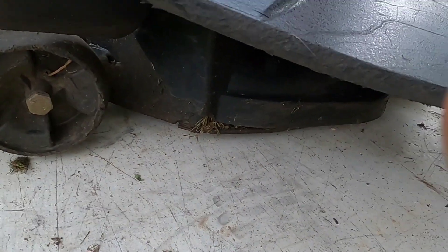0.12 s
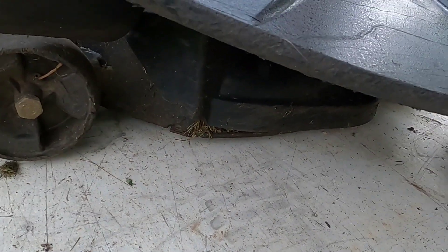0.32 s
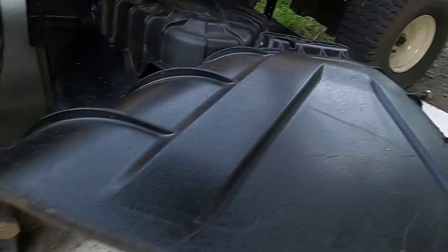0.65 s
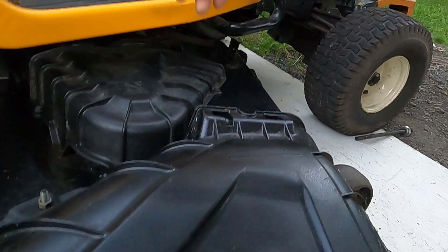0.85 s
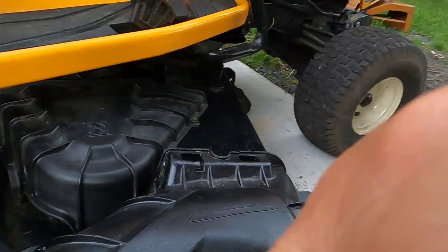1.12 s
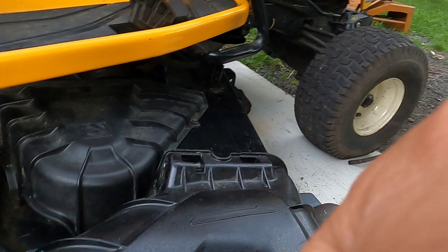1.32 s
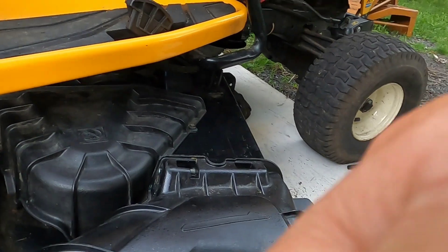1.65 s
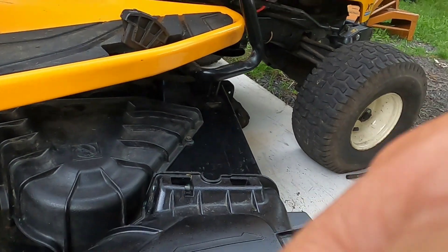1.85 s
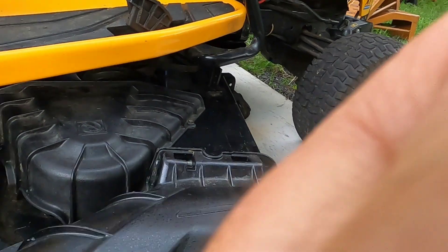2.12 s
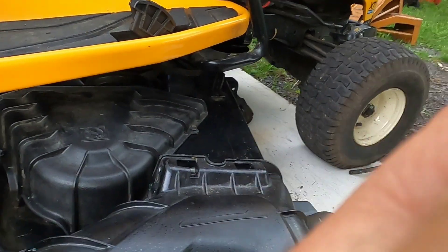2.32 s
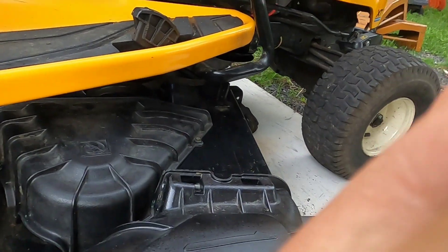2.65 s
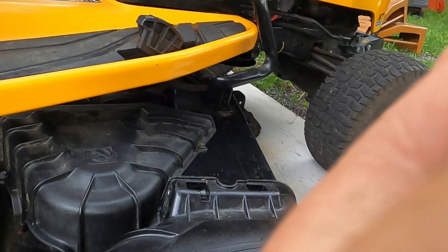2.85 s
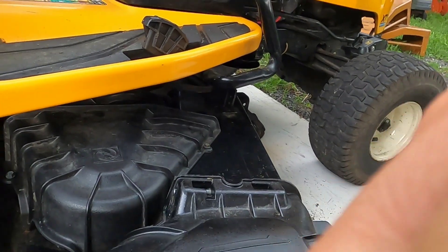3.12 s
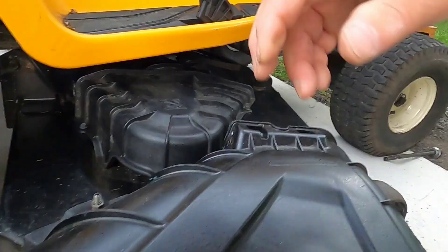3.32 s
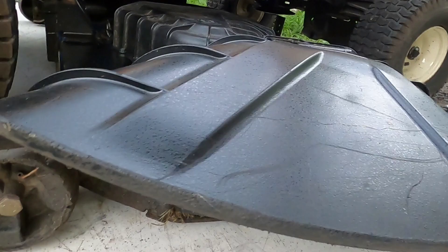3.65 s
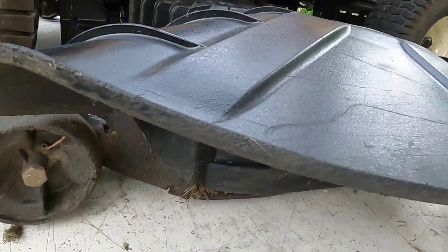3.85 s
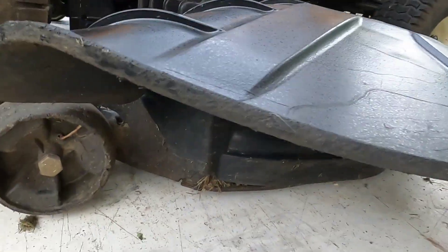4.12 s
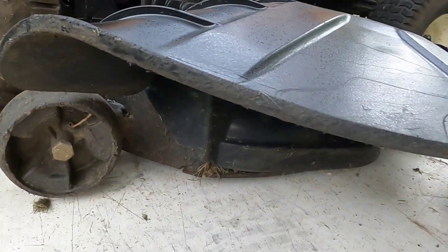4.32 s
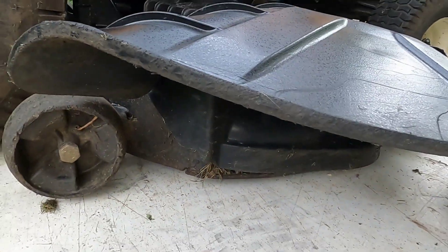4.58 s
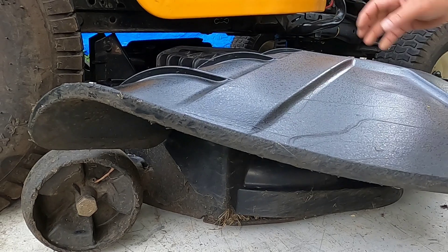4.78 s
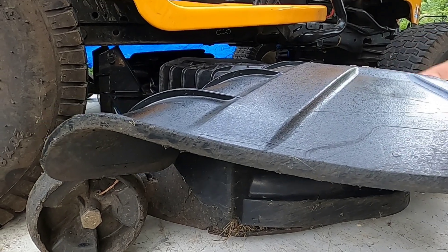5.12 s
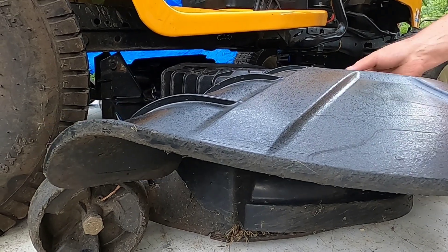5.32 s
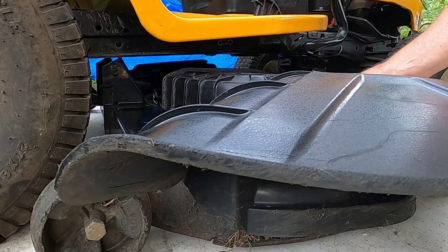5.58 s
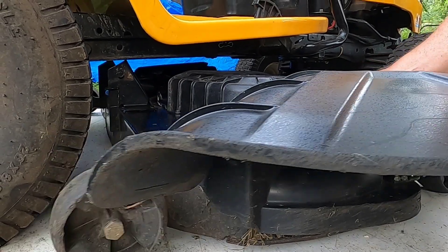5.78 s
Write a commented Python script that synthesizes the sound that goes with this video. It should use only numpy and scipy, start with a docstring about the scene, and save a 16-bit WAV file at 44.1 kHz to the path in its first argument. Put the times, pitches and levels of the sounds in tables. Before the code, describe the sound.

Outdoors, a hand rubs and jiggles loose plastic on a mower deck, then hard clunks, scraping and a rough groan as it is shoved.

```python
"""A steel mower deck is shoved into place under a riding mower, outdoors on a smooth board.
Struck shell modes knock, heavy sagging sines thud, stick-slip grains skid, rasp and groan; at last wheels roll.
Nearby, a hand rubs and swishes as filtered grains; the loose chute chirps and ticks.
Behind lie low rumble, light air, a far hum, a thin insect trill and two slurred bird notes."""
import sys
import numpy as np
from scipy import signal
from scipy.fft import rfft, irfft
from scipy.io import wavfile
from scipy.ndimage import uniform_filter1d

SR = 44100
rng = np.random.default_rng(int(sys.argv[2]) if len(sys.argv) > 2 else 0)


def unload_audio(sound):
    """Save the sound as a 16-bit wav file, at the path given as the first command line argument."""
    columns = np.transpose(np.atleast_2d(sound))
    # keep every value between -1 and 1, then stretch to whole-number steps
    steps = np.round(np.clip(columns, -1, 1) * 32767)
    wavfile.write(sys.argv[1], SR, steps.astype(np.int16))


N = 262395
TIME = np.arange(N) / SR
FREQ = np.fft.rfftfreq(N, 1 / SR)
EDGE_HZ = 15750


def amp(db):
    """Decibels to gain."""
    return 10 ** (np.asarray(db) / 20)


def evened(x):
    """Scales to rms 1."""
    return x / np.sqrt(np.mean(x ** 2) + 1e-20)


def add(mix, start_s, sound):
    """Mixes a sound in at start_s, cut to fit."""
    part = mix[max(0, round(start_s * SR)):][:len(sound)]
    part += sound[:len(part)]


def colour(x, points):
    """Filters by a gain curve that falls steeply outside its ends."""
    hz, db = np.transpose(points)
    octave = np.log2(FREQ + 1)
    below = np.maximum(np.log2(hz[0]) - octave, 0)
    above = np.maximum(octave - np.log2(hz[-1]), 0)
    gain_db = np.interp(octave, np.log2(hz), db) - 98 * (below + above)
    return irfft(rfft(x) * amp(gain_db), N)


def band(x, lo_hz, hi_hz, order=3):
    """Causal band-pass."""
    sos = signal.butter(order, [lo_hz, min(hi_hz, .49 * SR)], "band", fs=SR, output="sos")
    return signal.sosfilt(sos, x)


def wander(rate_hz):
    """Smooth chance of rms 1 that changes about rate_hz times a second."""
    return evened(irfft(rfft(rng.standard_normal(N)) * np.exp(-(FREQ / rate_hz) ** 2), N))


def grains(per_s, spread_db, smooth):
    """Tiny slips of uneven size over a smooth hiss."""
    size = amp(spread_db * np.minimum(rng.exponential(1, N), 4))
    size = size * rng.choice([-1, 1], N)
    slipping = rng.random(N) < per_s / SR
    return evened(size * slipping) + smooth * rng.standard_normal(N)


def drift(x, patch_db):
    """A moving contact point makes the colour of a rub drift in patches."""
    z = signal.stft(x, nperseg=512, noverlap=384)[2]
    patches = rng.standard_normal(z.shape)
    for _ in range(2):
        patches = uniform_filter1d(patches, size=5, axis=0)
        patches = uniform_filter1d(patches, size=16, axis=1)
    z = z * amp(patch_db * evened(patches))
    return evened(signal.istft(z, nperseg=512, noverlap=384)[1][:N])


def sing(hz, width_hz):
    """A fuzzy tone of rms 1: two quadrature carriers under independent slow noise."""
    turn = 2 * np.pi * np.cumsum(hz * np.ones(N)) / SR
    return evened(wander(width_hz) * np.cos(turn) + wander(width_hz) * np.sin(turn))


def hold(start_s, length_s, attack_s, release_s):
    """Linear attack, hold and exponential release."""
    attack = np.clip((TIME - start_s) / attack_s, 0, 1)
    return attack * np.exp(-np.maximum(TIME - start_s - length_s, 0) / release_s)


# modes of the deck shell: (pitch [Hz], relative level [dB], t60 [s])
SHELL_MODES = [(188.3, 17.5, 0.13), (319.3, 11.5, 0.3), (397, 7, 0.1), (456, -5.5, 0.088), (686, -8, 0.056),
               (893, -19.5, 0.055), (1628, 5, 0.031), (2074, -1.5, 0.012), (2740, -9.5, 0.0073),
               (3766, 5.5, 0.042)]
PLACE_DB = 3  # rms spread of mode levels


def shell(x, ring_db):
    """The contact plus the deck modes it sets ringing; each place of contact favours other modes."""
    t = np.arange(SR // 3) / SR
    place_db = PLACE_DB * rng.standard_normal(len(SHELL_MODES))
    ring = np.zeros(len(t))
    for (hz, db, t60_s), luck_db in zip(SHELL_MODES, place_db):
        mode = amp(db + luck_db - 60 * t / t60_s) * np.cos(2 * np.pi * hz * t)
        ring += mode * 2 * np.log(1000) / (t60_s * SR)  # unit peak gain at 0 dB
    return x + amp(ring_db) * signal.oaconvolve(x, ring)[:len(x)]


# level of the far hum before its flutter: (time [s], level [dB])
HUM_LEVEL = [(0, -61), (1.2, -54.5), (3.9, -54), (4.8, -46.5), (5.03, -44.5), (5.12, -50), (5.75, -49.5)]
HUM_HZ = 172.6


def hum():
    """A far motor: one sine with wandering pitch and level."""
    level_db = np.interp(TIME, *np.transpose(HUM_LEVEL)) + 3.96 * wander(12.6)
    hz = HUM_HZ + 3.8 * wander(13.5)
    return amp(level_db) * evened(np.sin(2 * np.pi * np.cumsum(hz) / SR))


TRILL_HZ, TRILL_DB = 5240, -71.5


def trill():
    """An insect: a thin fuzzy tone that comes and goes."""
    tone = sing(TRILL_HZ, width_hz=220)
    phrases = np.clip(1 + .6 * wander(8), 0, 1.5)
    return amp(TRILL_DB) * phrases * tone


# far bird notes: (time [s], length [s], start pitch [Hz], end pitch [Hz], level [dB])
BIRD_NOTES = [(1.779, 0.067, 2900, 2750, -61.5), (4.646, 0.13, 3700, 3460, -61)]


def birds():
    """Sines slurred downward with a fast waver in pitch."""
    out = np.zeros(N)
    waver = 1 + .04 * wander(700)
    for start_s, length_s, start_hz, end_hz, db in BIRD_NOTES:
        n = round(length_s * SR)
        hz = np.linspace(start_hz, end_hz, n) * waver[round(start_s * SR):][:n]
        note = np.sin(2 * np.pi * np.cumsum(hz) / SR) * signal.windows.tukey(n, .6)
        add(out, start_s, amp(db) * evened(note))
    return out


# filter of the air: (frequency [Hz], gain [dB])
AIR_GAIN = [(150, 0), (260, -9), (420, -21), (1300, -25), (2800, -31), (6000, -34), (8000, -43),
            (14000, -58)]
AIR_DB = -57


def outdoors():
    """Light air as slowly swaying filtered noise, with hum, trill and birds."""
    air = drift(colour(rng.standard_normal(N), AIR_GAIN), patch_db=3.0)
    return amp(AIR_DB + wander(0.16)) * air + hum() + trill() + birds()


# strokes of the hand over the chute; levels relative to each layer's trim:
# (middle [s], half-width to 1/e^2 [s], rub [dB], swish [dB], fizz [dB])
HAND_STROKES = [(0.094, 0.056, -63, -56.5, -66), (0.161, 0.02, -56, -49.5, -51.5),
                (0.269, 0.064, -57, -56, -61), (1.347, 0.097, -59, -64.5, -76),
                (1.594, 0.026, -54.5, -49.5, -50), (1.685, 0.16, -49.5, -58, -73),
                (1.874, 0.032, -45, -44, -68), (1.89, 0.002, -35, -29, -37),
                (2.19, 0.033, -44, -47.5, -45.5), (2.337, 0.084, -51, -53, -77),
                (2.456, 0.028, -38.5, -52.5, -54.5), (2.609, 0.067, -45, -56.5, -58),
                (2.734, 0.022, -37.5, -47.5, -59), (2.84, 0.019, -54, -53, -53.5),
                (3.228, 0.055, -48.5, -61, -84), (3.347, 0.042, -46.5, -60, -89)]


def stroking(column):
    """Gain of one layer of the strokes: the hand speeds up and slows down in a bell shape."""
    gain = np.zeros(N)
    for middle_s, width_s, *dbs in HAND_STROKES:
        gain += amp(dbs[column]) * np.exp(-2 * np.minimum(((TIME - middle_s) / width_s) ** 2, 20))
    return gain


# shoves that skid the deck over the board; levels at mid-shove, relative to each layer's trim:
# (start [s], length [s], grinding [dB], grit [dB], rumble [dB], swell [dB/s])
DECK_SHOVES = [(0.056, 0.24, -66, -84, -41, -3), (0.421, 0.095, -53.5, -65, -38, 143),
               (2.398, 0.66, -69, -64.5, -38.5, -3), (3.539, 0.13, -49.5, -57, -49, -18),
               (4.014, 0.11, -42, -49.5, -30, -150), (4.143, 0.024, -44, -49.5, -22, 7),
               (4.221, 0.084, -41, -48.5, -34, 82), (4.311, 0.068, -38, -40, -34, 5),
               (4.413, 0.13, -38.5, -44, -33, 37), (4.613, 0.12, -62, -63.5, -40, 13),
               (4.869, 0.072, -53.5, -58.5, -54, 7)]
BREAKAWAY_S, STOP_S = 0.014, 0.022  # a skid starts and stops quickly


def shoving(column):
    """Gain of one layer of the skids: each breaks away, swells or eases as it slides, and stops."""
    gain = np.zeros(N)
    for start_s, length_s, *dbs, swell_db_per_s in DECK_SHOVES:
        from_middle_s = np.clip(TIME - start_s, 0, length_s) - length_s / 2
        level = amp(dbs[column] + swell_db_per_s * from_middle_s)
        gain += level * hold(start_s, length_s, BREAKAWAY_S, STOP_S)
    return gain


# filter of the rumble: (frequency [Hz], gain [dB])
RUMBLE_GAIN = [(20, -19.5), (38, 3.5), (65, -3.5), (110, -5), (190, -12), (270, -17), (400, -26)]


def rumble(rest_db=-48, hand_db=7, deck_db=-1):
    """Levelled low noise, always present, that grows with each stroke and each shove."""
    shake = colour(rng.standard_normal(N), RUMBLE_GAIN)
    shake /= np.sqrt(uniform_filter1d(shake ** 2, SR // 8) + 1e-12)
    hand = amp(hand_db) * uniform_filter1d(stroking(column=1), SR // 6)
    deck = amp(deck_db) * uniform_filter1d(shoving(column=2), SR // 25)
    return shake * np.sqrt(amp(rest_db) ** 2 + hand ** 2 + deck ** 2)


# filters of rub, swish and fizz: (frequency [Hz], gain [dB])
RUB_GAIN = [(200, 7), (400, -6), (750, -10), (1500, -13), (2000, -72)]
SWISH_GAIN = [(1500, 6), (2700, 6.5), (5100, 4.5), (8500, -4), (11000, -14), (14000, -16.5)]
FIZZ_GAIN = [(4500, -20), (8000, -13), (11000, -12), (12300, 0), (14000, -2), (15700, -8)]
# the arm reaches over the deck: (start [s], length [s])
ARM_REACHES = [(0.294, 1.29), (2.1, 1.596)]


def handling(rub_db=-1, swish_db=-1, fizz_db=1, reach_rub_db=-63, reach_swish_db=-61):
    """The hand drags over plastic with a very high fizz; a faint steady rustle while the arm reaches."""
    grip = amp(2.1 * wander(90))
    reach = sum(hold(start_s, length_s, 0.28, 0.04) for start_s, length_s in ARM_REACHES)
    rub_level = amp(rub_db) * grip * stroking(column=0) + amp(reach_rub_db) * reach
    rub = evened(colour(grains(900, 2.7, 0.35), RUB_GAIN)) * rub_level
    hiss = colour(grains(3000, 2.6, 1.0), SWISH_GAIN)
    stroke_hiss = drift(hiss, patch_db=3.5)
    reach_hiss = drift(hiss, patch_db=2.6)
    swish = stroke_hiss * amp(swish_db) * grip * stroking(column=1)
    swish += reach_hiss * amp(reach_swish_db) * reach
    fizz = evened(colour(grains(7400, 6.0, 0.9), FIZZ_GAIN))
    return rub + swish + amp(fizz_db) * fizz * stroking(column=2)


# filter of the chute ticks: (frequency [Hz], gain [dB])
TICK_GAIN = [(200, 23), (800, 5), (1500, 5.5), (4000, -2.5), (8000, -36)]
JIGGLE_S, SETTLED_S = 1.9, 3.6  # the chute is worked to and fro between these times


def ticks(tick_db=-59):
    """While it is worked to and fro the loose chute ticks at random against the shell."""
    taps = colour(shell(grains(110, 3, 0), ring_db=-6), TICK_GAIN)
    return amp(tick_db) * evened(taps) * hold(JIGGLE_S, SETTLED_S - JIGGLE_S, 0.075, 0.056)


# chirps of one part of the chute or frame: (peak time [s], decay constant [s], pitch [Hz], level [dB])
CHIRP_SLIPS = [(0.217, 0.0019, 870, -38.5), (0.472, 0.0032, 790, -37), (1.405, 0.016, 1690, -48.5),
               (1.631, 0.0068, 916, -37.5), (1.697, 0.0076, 2060, -34), (2.754, 0.0023, 4000, -30.5),
               (2.756, 0.013, 750, -35.5), (2.581, 0.023, 4260, -48), (3.217, 0.024, 2840, -52.5),
               (3.594, 0.069, 3600, -54.5), (4.167, 0.0046, 1900, -30), (4.181, 0.014, 536, -31.5),
               (4.298, 0.0013, 4080, -26.5), (5.228, 0.0097, 2450, -49.5)]


def slips(slip_db=0, spread=1.12):
    """A contact lets go for a moment: a burst of friction swells and fades in one resonance."""
    out = np.zeros(N)
    t = np.arange(-SR // 10, SR // 10) / SR
    for peak_s, decay_s, hz, db in CHIRP_SLIPS:
        swell = np.exp(np.where(t < 0, 2 * t, -t) / decay_s)  # starts twice as fast as it fades
        chirp = band(rng.standard_normal(len(t)) * swell, hz / spread, hz * spread, order=2)
        chirp *= np.sqrt(decay_s * SR) / np.linalg.norm(chirp)
        add(out, peak_s + t[0], amp(db + slip_db) * chirp)
    return out


# groan of the rim under full weight, before roughness: (time [s], pitch [Hz], level [dB])
GROAN_PATH = [(4.251, 1001, -54), (4.324, 919, -29.5), (4.345, 920, -43), (4.39, 885, -48),
              (4.425, 730, -38.5), (4.495, 705, -46.5), (4.523, 740, -34), (4.549, 880, -40),
              (4.585, 764, -47), (4.61, 756, -79)]


def groan(rough_db=3):
    """Under full weight stick and slip lock into a rough note that slides with the load."""
    s, hz, db = np.transpose(GROAN_PATH)
    pitch_hz = np.interp(TIME, s, hz) * (1 + .12 * wander(300))
    level = amp(np.interp(TIME, s, db) + rough_db * wander(93))
    level = level * (TIME > s[0]) * (TIME < s[-1])
    return level * evened(np.sin(2 * np.pi * np.cumsum(pitch_hz) / SR))


# filters of grinding, grit and rolling: (frequency [Hz], gain [dB])
GRIND_GAIN = [(200, -5.5), (330, -5), (540, -8.5), (720, -2.5), (950, -6), (1150, -12.5), (1700, -17)]
GRIT_GAIN = [(1350, -3.5), (1800, -6.5), (2400, -7.5), (4300, -9), (5000, -13.5), (6000, -15), (8300, -22),
             (12500, -31.5), (15000, -43)]
ROLL_GAIN = [(80, 14), (105, 4), (170, 6.5), (245, 2.5), (400, -14), (750, -15), (1100, -25.5), (2200, -30)]
# resonances in which the steel rim rasps: (pitch [Hz], width [Hz], relative level [dB])
RASP_TONES = [(1480, 130, -3.5), (1950, 110, -9), (2800, 110, -8.5), (4400, 200, -6)]
# gauge wheels: level at the start, before the layer trims, and its rise as they gather speed
ROLL_START_S, ROLL_DB, ROLL_RISE_DB_PER_S = 5.742, -51, 74.5


def skids(grind_db=0, grit_db=0, roll_db=11, boom_db=2, wheel_grit_db=-20):
    """The rim sticks and slips on the board and the shell booms; at last the gauge wheels roll."""
    judder = amp(0.83 * wander(73))
    grind = drift(colour(shell(grains(1100, 2.8, 0.2), ring_db=-35.0), GRIND_GAIN), patch_db=3.5)
    sand = grains(2000, 3.0, 0.25)
    grit = drift(colour(shell(sand, ring_db=-12), GRIT_GAIN), patch_db=2.8)
    bend = 1 + .009 * wander(22)  # the rim flexes under the load, and its pitches with it
    rasp = sum(amp(db) * sing(hz * bend, width_hz) for hz, width_hz, db in RASP_TONES)
    roll = evened(colour(grains(450, 0.68, 0.76), ROLL_GAIN))
    roll /= (uniform_filter1d(roll ** 2, SR // 16) + 1e-12) ** .5  # the wheels never leave the board
    low = (amp(grind_db) * grind + amp(boom_db) * roll) * shoving(column=0)
    high = amp(grit_db) * (grit + rasp) * shoving(column=1)
    speed = amp(ROLL_DB + ROLL_RISE_DB_PER_S * (TIME - ROLL_START_S))
    speed = speed * hold(ROLL_START_S, 1, BREAKAWAY_S, STOP_S)
    wheels = speed * (amp(roll_db) * roll + amp(wheel_grit_db) * grit)
    return judder * (low + high + wheels)


# thuds of the deck's weight and the flexing chute: (time [s], nominal pitch [Hz], peak [dB], t60 [s])
DULL_THUDS = [(0.136, 170.4, -29.5, 0.17), (0.198, 144, -28.5, 0.087), (1.437, 163, -30, 0.067),
              (1.611, 64, -25.5, 0.033), (1.702, 122, -26, 0.033), (1.891, 188, -17.5, 0.017),
              (1.893, 57.4, -22.5, 0.14), (2.466, 138, -19.5, 0.073), (2.744, 53.7, -14.5, 0.085),
              (2.803, 189, -22, 0.011), (3.005, 84, -23, 0.013), (4.027, 340.5, -12.5, 0.037),
              (4.029, 208, -14, 0.031), (4.058, 158.5, -12, 0.1), (4.078, 76, -15, 0.077),
              (4.103, 96, -17.5, 0.1), (4.172, 57, -18.5, 0.096), (4.281, 172, -23.5, 0.081),
              (4.623, 111.6, -24, 0.14), (5.17, 81, -27, 0.28), (5.242, 133, -27, 0.16),
              (5.612, 133, -16.5, 0.012), (5.62, 415, -31.5, 0.17), (5.927, 150, -18, 0.14)]


def thuds(rise_s=0.0026, sag=0.21):
    """Heavy soft blows: a few low cycles that wobble and sag in pitch as the load comes off."""
    out = np.zeros(N)
    t = np.arange(SR // 3) / SR
    flex = .08 * wander(120)
    for start_s, hz, db, t60_s in DULL_THUDS:
        wobble = np.roll(flex, -round(start_s * SR))[:len(t)]
        bend = 1 + wobble + sag * (np.exp(-t / 0.028) - .5)
        turns = np.cumsum(hz * bend) / SR
        swell = (1 - np.exp(-(t / rise_s) ** 2)) * amp(-60 * t / t60_s)
        add(out, start_s, amp(db) * swell / swell.max() * np.sin(2 * np.pi * turns))
    return out


# knocks of shell, chute and brackets:
# (time [s], clank level [dB], hardness [dB], clank pitch [Hz], t60 of the clank's drive [s])
DECK_KNOCKS = [(0.133, -39, -4.5, 753, 0.069), (0.176, -55, -12, 965, 0.18),
               (0.365, -49.5, -1.5, 850, 0.12), (0.434, -58.5, -6, 835, 0.17), (0.502, -42, 5, 960, 0.12),
               (0.519, -53, 11, 1270, 0.036), (1.42, -50.5, 1, 1070, 0.094), (1.697, -38, 1.5, 1020, 0.022),
               (1.888, -25, 4.5, 770, 0.016), (2.144, -54.5, 11, 880, 0.045), (2.439, -41, 6.5, 880, 0.22),
               (2.585, -42.5, 1.5, 790, 0.087), (2.703, -47.5, 4, 810, 0.074),
               (2.753, -46.5, 8, 694, 0.052), (2.8, -46, 6, 960, 0.042), (2.842, -54, 7, 700, 0.018),
               (2.869, -46, 3, 700, 0.13), (2.959, -61, 7, 880, 0.062), (3.006, -52.5, 6, 1000, 0.024),
               (3.074, -53, 10.5, 1530, 0.015), (3.084, -57.5, 10.5, 1300, 0.023),
               (3.232, -53, 10.5, 830, 0.032), (3.282, -50, 0.5, 1260, 0.025), (3.517, -48, 6, 1110, 0.049),
               (3.621, -45.5, 1.5, 1200, 0.024), (3.652, -50, 7, 1070, 0.058), (4.026, -27.5, 0, 850, 0.17),
               (4.079, -42, -8.5, 760, 0.15), (4.165, -28, -1, 935, 0.047), (4.232, -40.5, -7, 670, 0.19),
               (4.295, -28.5, -1, 760, 0.049), (4.622, -47, 2, 716, 0.066),
               (4.889, -48.5, -2.5, 570, 0.042), (5.228, -49, 5, 1100, 0.44), (5.612, -38, -0.5, 820, 0.15),
               (5.776, -47, 0, 690, 0.17)]
CRACK_DB = -11.5  # crack against clank at hardness 0; a harder contact trades body for crack
CRACK_TOP_HZ, HARD_DB_PER_OCTAVE = 5020, 12.5  # a harder contact also reaches higher
LEAD_S = 0.0037  # the parts scuff together just before they strike


def knocks(chatter=2.15, ring_db=1, spread=1.292, lead_db=-7):
    """Each blow is a brief scuff, one sharp contact and a dying chatter of loose parts."""
    out = np.zeros(N)
    strike = SR // 50  # sample of the contact
    t = np.arange(-strike, SR // 4) / SR
    after = np.maximum(t, 0)
    lead = np.where(t < 0, amp(lead_db) * np.exp(-abs(t) / LEAD_S), 1)
    for start_s, strength_db, hard_db, hz, t60_s in DECK_KNOCKS:
        rattle = lead * rng.standard_normal(len(t)) * np.exp(.5 * rng.standard_normal(len(t)))
        top_hz = np.clip(CRACK_TOP_HZ * 2 ** (hard_db / HARD_DB_PER_OCTAVE), SR / 20, EDGE_HZ)
        soften = signal.butter(2, top_hz, fs=SR, output="sos")
        # (level [dB], low edge [Hz], high edge [Hz], share of t60): the treble dies first
        body = (-hard_db, 190, 520, 1.1)
        clank = (0, hz / spread, hz * spread, 1)
        crack = (CRACK_DB + hard_db, 1650, top_hz, .75)
        for k, (db, lo_hz, hi_hz, share) in enumerate([body, clank, crack]):
            drive = rattle * amp(-60 * after / (t60_s * share))
            # short blows are nearly clean
            drive *= chatter * np.tanh((t60_s / 0.026) ** 2) / np.linalg.norm(drive)
            drive[strike] += 1
            damped = shell(drive, ring_db) * amp(-20 * after / t60_s)  # the load damps the shell
            hit = signal.sosfilt(soften, band(damped, lo_hz, hi_hz, order=2))
            hit *= (-1) ** k  # alternating signs join the bands into one broad blow
            hit *= np.sqrt(.02 * SR) / np.linalg.norm(hit)
            add(out, start_s + t[0], amp(strength_db + db) * hit)
    return out


def underside(x, wet_db=-17, t60_s=0.096):
    """Short scattered reflections between board, tyres and chassis."""
    t = np.arange(SR // 4) / SR
    taps = rng.standard_normal(len(t)) * (rng.random(len(t)) < 2000 / SR)
    taps = taps * (t > .004) * amp(-60 * t / t60_s)
    return x + amp(wet_db) * signal.oaconvolve(x, taps / np.linalg.norm(taps))[:N]


# treble loss of the left microphone: (frequency [Hz], gain [dB])
LEFT_GAIN = [(6000, 0), (9000, -2), (11000, -5), (12500, -10.5), (16000, -32)]


def scene():
    """Both microphones hear the same sound, except for the duller top of the left one."""
    deck = underside(knocks() + ticks() + slips() + skids() + groan())
    right = deck + thuds() + handling() + rumble() + outdoors()
    hz, db = np.transpose(LEFT_GAIN)
    left = irfft(rfft(right) * amp(np.interp(FREQ, hz, db)), N)
    return np.array([left, right])


def record(dry):
    """Linear-phase low-pass at EDGE_HZ."""
    lowpass = signal.firwin(511, EDGE_HZ, window=("kaiser", 9), fs=SR)
    return signal.oaconvolve(dry, lowpass[None], "same")


dry = scene()
out = record(dry)
unload_audio(out)
```